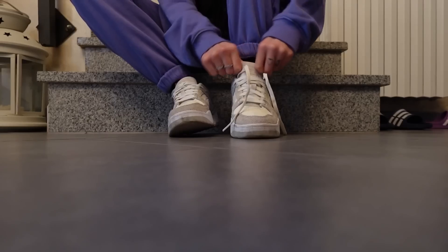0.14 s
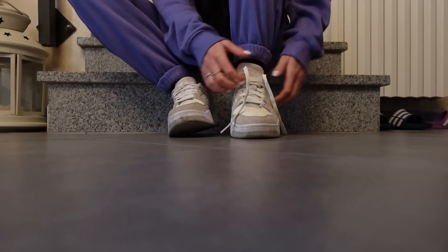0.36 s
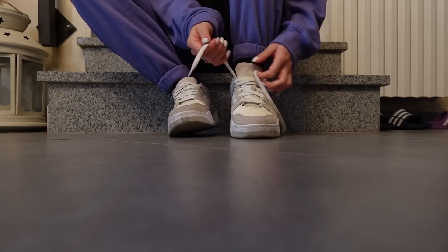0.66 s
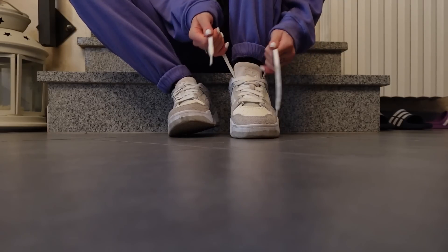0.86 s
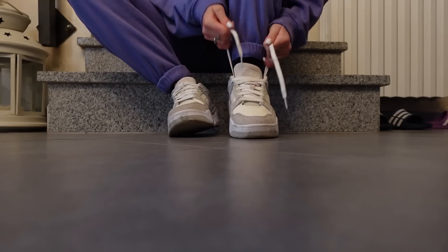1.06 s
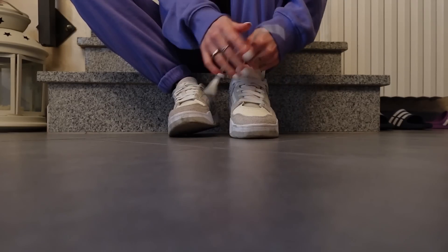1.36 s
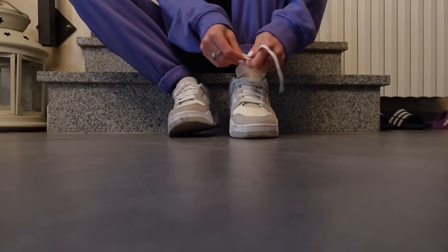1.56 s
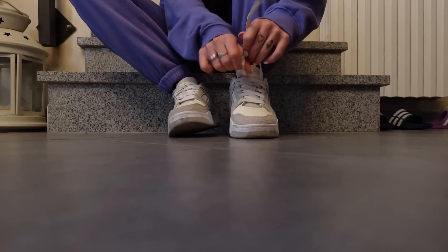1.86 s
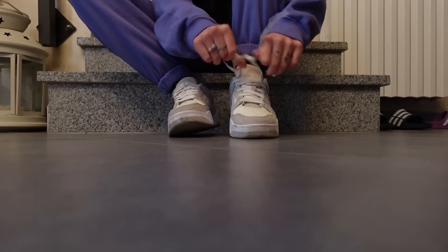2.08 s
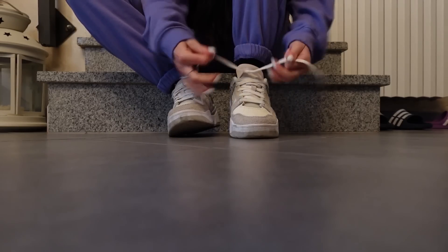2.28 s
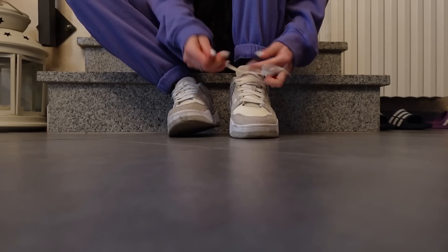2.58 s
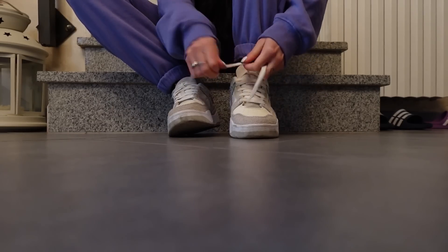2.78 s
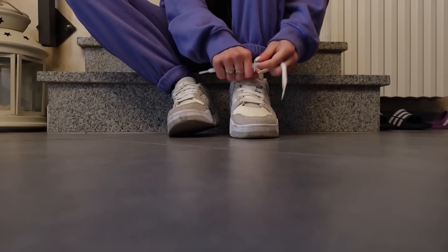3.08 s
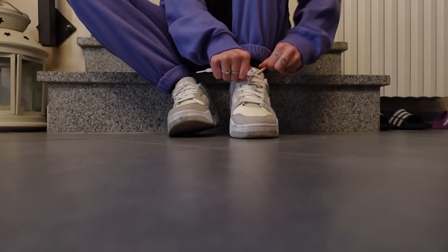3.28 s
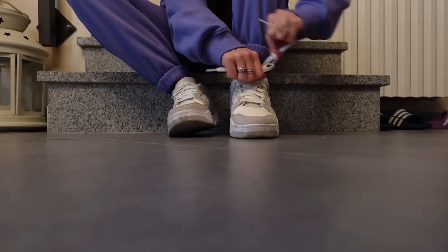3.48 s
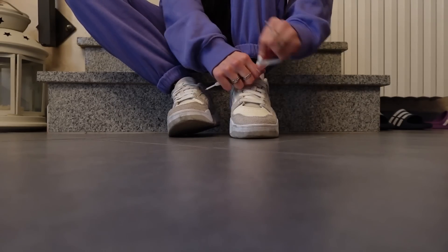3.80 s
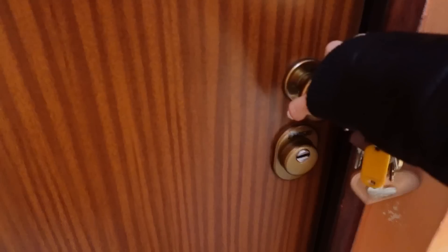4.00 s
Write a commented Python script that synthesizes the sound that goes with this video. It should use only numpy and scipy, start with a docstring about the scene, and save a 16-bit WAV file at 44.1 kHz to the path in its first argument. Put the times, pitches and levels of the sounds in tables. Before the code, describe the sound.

Close up in a quiet stone hallway, shoelaces are tugged and knotted: short grainy rubs, bright lace-on-lace hisses, a quick cluster of hollow knocks early on, tiny plastic-tip ticks and one sharp double snap midway. It thins to near silence, then at the very end a door and its metal lock burst out far louder, ringing in a stairwell with a key clink.

```python
"""Shoe laces are pulled and knotted close up: strokes of grainy noise ring the shoe's hollow and scratch its
skin, and lace slides on lace as a bright, denser hiss. Slips, knocks and lace tips are short decaying sines,
with a noisy echo from stone walls. At the end a door and its lock ring out loudly in a stairwell as dense
resonant noise over low booms, and a key clinks. Faint filtered noise is the air of the quiet hallway."""
import sys
import numpy as np
from scipy import signal
from scipy.fft import rfft, irfft
from scipy.io import wavfile

SR = 44100
rng = np.random.default_rng(int(sys.argv[2]) if len(sys.argv) > 2 else 0)


def wav_record(signal):
    """Record a signal, one row per channel, as 16-bit PCM in the file named by sys.argv[1]."""
    frames = np.transpose(np.atleast_2d(signal))
    bounded = np.clip(frames, -1, 1)
    # unit amplitude maps onto the largest positive 16-bit level
    quanta = np.round(bounded * 32767).astype(np.int16)
    wavfile.write(sys.argv[1], SR, quanta)


N = 182970

# resonances of the shoe's hollow: [f/Hz, width/Hz, relative level/dB]
SHOE_MODES = [(663.6, 92, 6.5), (850, 107, 0), (1042, 114, -4.5), (1415, 780, 4.5)]
# pulls of lace and finger over the shoe: [t/s, length/s, hollow level/dB, scratch level/dB, hollow f/Hz]
LACE_PULLS = [(0.036, 0.071, -41, -46, 1000), (0.163, 0.1, -45, -46, 1190), (.306, 0.015, -49, -63, 800),
              (0.426, 0.022, -40.5, -47, 740), (0.465, 0.093, -36, -43.5, 1050),
              (0.567, 0.068, -44, -53.5, 1200), (0.638, 0.088, -46, -52.5, 880),
              (0.723, .11, -46.5, -48, 800), (0.847, 0.093, -53, -53.5, 900),
              (0.942, 0.051, -45.5, -46.5, 1960), (0.998, 0.05, -52, -52, 1900),
              (1.17, 0.085, -53, -53, 890), (1.691, 0.022, -54.5, -57, 1200), (1.744, 0.08, -53, -55, 950),
              (1.843, 0.06, -51, -50, 930), (1.963, 0.02, -52, -53, 1490), (2.106, 0.079, -48, -52.5, 850),
              (2.191, 0.081, -42, -47, 830), (2.279, 0.049, -45.5, -46.5, 870),
              (2.335, 0.062, -51, -49, 900), (2.447, 0.042, -38.5, -40, 1200),
              (2.641, 0.029, -52.5, -56, 1110), (2.747, 0.14, -56, -61.5, 900),
              (3.019, 0.03, -53, -51.5, 900), (3.135, 0.089, -56, -53.5, 1200),
              (3.248, 0.068, -44.5, -48, 1390)]


def from_db(db):
    """Gain of a level in dB."""
    return 10 ** (np.asarray(db) / 20)


def rms_one(x):
    """Scaled to rms 1."""
    return x / np.sqrt(np.mean(x ** 2) + 1e-20)


def at_hz(points, hz):
    """A spectrum table read on a log-frequency axis."""
    points = np.array(points)
    return np.interp(np.log(hz), np.log(points[:, 0]), points[:, 1])


def peaks(modes, hz):
    """Magnitude of resonances (Hz, width in Hz, dB) whose powers add."""
    return np.sqrt(sum(from_db(2 * db) / (1 + (2 * (hz - f) / width) ** 2) for f, width, db in modes))


def shaped(x, gain):
    """Filtered by a magnitude given as a function of frequency; rms 1."""
    hz = np.maximum(np.fft.rfftfreq(N, 1 / SR), 1)
    return rms_one(irfft(rfft(x) * gain(hz), N))


def stereo(mid, side, likeness, lean):
    """Mixes two signals to a left-right pair, with likeness and balance set frequency by frequency."""
    hz = np.maximum(np.fft.rfftfreq(N, 1 / SR), 1)
    alike = np.clip(at_hz(likeness, hz), 0, 1)
    tilt = from_db(at_hz(lean, hz) / 2)
    m = rfft(mid) * np.sqrt((1 + alike) / 2)
    s = rfft(side) * np.sqrt((1 - alike) / 2)
    return irfft([(m + s) * tilt, (m - s) / tilt], N)


def drift(rate_hz):
    """Slow chance: noise twice through a one-pole low-pass; rms 1."""
    r = np.exp(-2 * np.pi * rate_hz / SR)
    noise = rng.standard_normal(N + SR)
    slow = signal.lfilter([1], [1, -2 * r, r * r], noise)[SR:]   # the first second settles the filter
    return rms_one(slow)


def grains(per_s, spread_db):
    """Two unrelated trains of fibre slips of uneven size and random sign."""
    sizes = from_db(spread_db * np.minimum(rng.exponential(1, (2, N)), 5))
    signs = rng.choice([-1, 1], (2, N))
    return sizes * signs * (rng.random((2, N)) < per_s / SR)


def ring(at_s, hz, t60):
    """A sine that starts at a moment at height 1 and decays by 60 dB in t60 seconds."""
    out, first = np.zeros(N), int(at_s * SR) + 1
    t = np.arange(first, min(first + int(2 * t60 * SR) + 2, N)) / SR - at_s
    out[first:first + len(t)] = np.sin(2 * np.pi * hz * t) * from_db(-60 * t / t60)
    return out


def strokes(start_s, length_s, level_db, rise_s, fall_s):
    """Level in time of strokes that swell, hold and let go; overlapping strokes add in power."""
    swell = 0.18   # the rise grows by this share of the stroke's length
    t, power = np.arange(N) / SR, 0
    for s, length, db in zip(start_s, length_s, level_db):
        rise = np.clip((t - s) / (rise_s + swell * length), 0, 1)
        fall = np.exp(-np.maximum(t - s - length, 0) / fall_s)
        power = power + (from_db(db) * rise * fall) ** 2
    return np.sqrt(power)


def drag():
    """Slips of the lace excite the shoe's hollow, pitched by the grip, and scratch on its skin; the sole thuds."""
    # colour of the scratch: [f/Hz, relative level per Hz/dB]
    scratch_colour = [(710, -55), (1200, -23.5), (1790, -5.5), (2200, -1), (4530, -7.5), (5690, -15.5),
                      (7000, -14.5), (9100, -32), (15400, -120)]
    # colour of the sole's thud: [f/Hz, relative level per Hz/dB]
    thud_colour = [(24, -69), (40, -42), (123, -25.5), (243, 4), (415, -4.5), (450, -18), (580, -35),
                   (990, -120)]
    # the sole pressed on the floor: [t/s, length/s, level/dB]
    presses = [(0.426, .03, -52.5), (0.498, 0.087, -51), (0.675, 0.034, -46), (.75, 0.06, -56),
               (1.883, 0.017, -62), (2.457, 0.03, -61), (3.036, 0.018, -67.5), (3.244, .03, -59.5)]
    catch_db = 3.0      # rms swing of the level
    pull_width = 0.63   # bandwidth of a pull's pitch, as a share of that pitch

    def hollow_gain(hz):
        return peaks(SHOE_MODES, hz) / (1 + (560 / hz) ** 8) / (1 + (hz / 2600) ** 4)

    body = shaped(grains(5000, spread_db=2.0), hollow_gain)
    scratch = shaped(grains(9000, spread_db=2.5), lambda hz: from_db(at_hz(scratch_colour, hz)))
    thud = shaped(rng.standard_normal((2, N)), lambda hz: from_db(at_hz(thud_colour, hz)))
    catching = from_db(catch_db * drift(85))   # the weave catches and lets go

    hollow = 0
    for at, span, db, _, hz in LACE_PULLS:
        pitched = rms_one(signal.lfilter(*signal.iirpeak(hz, 1 / pull_width, SR), body))
        hollow = hollow + strokes([at], [span], [db], rise_s=0.0099, fall_s=0.023) * pitched

    s, length, _, scratch_db, _ = np.transpose(LACE_PULLS)
    scratching = strokes(s, length, scratch_db, rise_s=0.0032, fall_s=0.026) * scratch
    pressing = strokes(*np.transpose(presses), rise_s=0.0061, fall_s=0.032) * thud
    return (hollow + scratching) * catching + pressing


def slide():
    """Very dense fibre slips merge to a bright hiss, in slides and in every pull."""
    # colour of the hiss: [f/Hz, relative level per Hz/dB]
    hiss_colour = [(1200, -60), (2940, -19), (5000, 1.5), (6070, -6), (6830, 1.5), (11900, 6), (15100, 2),
                   (16000, -26)]
    # woven lace sliding on lace: [t/s, length/s, level/dB]
    slides = [(0.03, 0.1, -57), (0.177, 0.074, -50), (1.172, 0.025, -52), (1.542, 0.035, -58),
              (1.656, 0.046, -48), (1.74, .095, -50), (1.842, 0.043, -45.5), (1.962, 0.022, -47),
              (2.099, .013, -36), (2.118, 0.135, -44), (2.298, 0.014, -48), (2.392, .034, -50.5),
              (2.442, 0.036, -42.5), (2.578, 0.029, -47), (2.637, 0.03, -52.5), (3.005, 0.033, -51.5),
              (3.123, 0.07, -49)]
    pull_hiss_db, hiss_follows = -34.5, 0.45   # base level, plus this share of the pull's scratch level
    hiss = shaped(grains(23000, spread_db=3.5), lambda hz: from_db(at_hz(hiss_colour, hz)))
    pulls = [(s, length, pull_hiss_db + hiss_follows * scratch_db) for s, length, _, scratch_db, _ in LACE_PULLS]
    level = strokes(*np.transpose([*pulls, *slides]), rise_s=0.009, fall_s=0.014)
    return level * from_db(2.0 * drift(70)) * hiss


def knocks():
    """A crack at its own pitch with a bright snap, then the shoe's hollow rings on."""
    # slips and knocks on the shoe: [t/s, level/dB, f/Hz, snap re crack/dB, hollow ring re crack/dB]
    hits = [(0.4298, -24, 1530, 10.5, -8), (.44, -19, 795, -8, -7.5), (0.4693, -19, 1410, 1, -11),
            (.4805, -21, 2200, -6, -23), (.491, -18, 2900, -4, -26), (0.4976, -8, 1280, -25, -24),
            (0.5097, -15, 1430, -20, -16.5), (.5125, -20, 1500, -20, -17), (.521, -21, 800, -14, -14),
            (.525, -9.5, 1120, -11, -12.5), (.531, -17, 2490, -3, -17), (.548, -12.5, 2450, -4, -17),
            (.554, -9.5, 1120, -16, -19), (.643, -19, 1360, -20, -16), (.683, -12.5, 1000, -9, -21),
            (.7533, -26, 1600, -3, -13), (.768, -18.5, 740, -9, -15), (0.801, -18, 850, -10, -14),
            (1.696, -30, 1210, -15, -21), (1.891, -27.5, 596, -9, -17), (2.1119, -16, 960, -23, -19.5),
            (2.2653, 0, 2210, -33, -23.5), (2.2732, -4.5, 2800, -24, -35), (2.299, -22, 3200, -9, -29),
            (2.4036, -24, 1200, -11, -21.5), (2.454, -20, 850, -10, -17.5), (2.662, -30.5, 1200, -9, -16.5),
            (2.813, -32.5, 690, -9, -11), (3.2521, -15.5, 1430, -15, -23), (3.953, -26, 1010, -16, -16.5)]
    out = np.zeros(N)
    mode_luck = rng.normal(0, 1, (len(hits), len(SHOE_MODES)))
    for (s, db, hz, snap_db, ring_db), luck in zip(hits, mode_luck):
        crack = ring(s, hz, 5.6 / hz)   # gone in a few periods
        snap = from_db(snap_db) * ring(s, 3500, 0.00085)
        hollow = 0
        for (f, width, level), chance in zip(SHOE_MODES, luck):
            mode_db = level + ring_db + 1.5 * chance
            # the hollow answers a little late; a narrow mode rings longer
            hollow = hollow + from_db(mode_db) * ring(s + 0.00056, f, 2.04 / width)
        out += from_db(db) * (crack + snap + hollow)
    return signal.sosfilt(signal.butter(4, 5600, fs=SR, output="sos"), out)   # low-pass, Hz


def ticks():
    """Hard plastic tips: a wide click with a millisecond or two of ring."""
    # lace tips ticking: [t/s, level/dB, f/Hz]
    tips = [(1.5476, -30.5, 10800), (1.567, -31.5, 8000), (1.666, -27, 13100), (1.6993, -22.5, 4230),
            (1.9752, -22, 11100), (1.985, -28, 12500), (2.007, -30, 12500), (2.1114, -24, 12200),
            (2.3108, -26, 12800), (2.3153, -24, 12800), (2.3991, -24, 13700), (2.4049, -19.5, 4800),
            (2.416, -23, 13500), (2.425, -29, 12500), (2.6932, -29, 12200), (3.3492, -27, 11200)]
    out = np.zeros(N)
    for s, db, hz in tips:
        click = from_db(-8.0) * ring(s, 10700, 0.00058)
        out += from_db(db) * (ring(s, hz, 0.0018) + click)
    return out


def echo(x):
    """Stone walls send each hit back as a short noisy tail."""
    t60_s, level_db = 0.16, -12
    t = np.arange(int(.3 * SR)) / SR
    tail = rng.standard_normal((2, len(t))) * from_db(-60 * t / t60_s) * (t > .002)   # 2 ms gap
    tail /= np.sqrt(np.sum(tail ** 2, axis=1, keepdims=True))   # unit energy
    return from_db(level_db) * signal.fftconvolve(x[None], tail, axes=1)[:, :N]


def door():
    """The stairwell smears the blow to dense noise that keeps the rings of leaf and lock; one key clinks."""
    # colour of the wash: [f/Hz, relative level per Hz/dB]
    colour = [(18, -60), (45, -38), (215, -12.5), (252, -1), (355, -11), (632, 3), (1280, -7), (1860, 0),
              (3490, -13.5), (5040, -8.5), (9220, -29), (11100, -30), (16000, -42)]
    # resonances of door leaf and lock: [f/Hz, width/Hz, relative level/dB]
    leaf_and_lock = [(1050, 40, -6), (2030, 70, -7), (2470, 60, 3), (2880, 86, -1.5), (4070, 110, -0.5),
                     (4960, 290, 4.5), (6000, 210, -7), (3360, 400, -11)]
    # lowest modes of the door leaf: [f/Hz, level/dB, t60/s]
    booms = [(68, -53, 2.8), (250, -30, .3), (650, -37, .8)]
    # ringing modes of the key: [f/Hz, relative level/dB, t60/s]
    key_modes = [(8000, 1.5, 0.027), (10730, 3, 0.054), (11400, -4, 0.061), (11600, 0, 0.15),
                 (14150, 0, .04)]
    # stereo width: [f/Hz, left-right likeness]
    door_likeness = [(60, 1), (240, 0.99), (950, 0.92), (3770, 0.8), (15000, 0.47)]
    # stereo balance: [f/Hz, left minus right/dB]
    door_lean = [(60, 1), (240, -1.5), (950, 0.5), (3770, -2.5), (15000, 2)]
    door_s, rise_s, door_db, t60_s = 3.993, 0.021, -21.5, 1.2
    key_s, key_db = 4.0455, -32.5

    def wash_gain(hz):
        return from_db(at_hz(colour, hz)) + peaks(leaf_and_lock, hz) / (1 + (hz / 7000) ** 6)

    t = np.maximum(np.arange(N) / SR - door_s, 0)
    swell = np.minimum(t / rise_s, 1)
    wash = shaped(grains(12000, spread_db=1.5), wash_gain) * swell * from_db(door_db - 60 * t / t60_s)
    boom = swell * sum(from_db(db) * ring(door_s, hz, t60) for hz, db, t60 in booms)
    key = sum(from_db(db) * ring(key_s, hz, t60) for hz, db, t60 in key_modes)
    key = key + from_db(10) * ring(key_s, 12000, .001)   # the touch of metal
    return stereo(wash[0] + from_db(key_db) * key + boom, wash[1], door_likeness, door_lean)


def hallway_air():
    """The quiet hallway's air: steady coloured noise whose level sways slowly."""
    # colour of the air: [f/Hz, relative level per Hz/dB]
    air_colour = [(18, -80), (30, -60), (239, -15), (437, -8), (569, -3.5), (721, -4.5), (780, -2.5),
                  (2610, -3), (3580, -5), (5740, -9), (15900, -13)]
    level_db, sway_db = -50.5, .8
    air = shaped(rng.standard_normal((2, N)), lambda hz: from_db(at_hz(air_colour, hz)))
    return air * from_db(level_db + sway_db * drift(0.67))


def scene():
    """Laces and shoe, then the door, over hallway air."""
    # stereo width of laces, shoe and air: [f/Hz, left-right likeness]
    near_likeness = [(60, 0.98), (240, 0.9), (950, 0.85), (3770, 0.78), (15000, .97)]
    # stereo balance of laces, shoe and air: [f/Hz, left minus right/dB]
    near_lean = [(950, 0), (3770, -.5)]
    hits = knocks() + ticks()
    # small things radiate little bass
    hits = signal.sosfilt(signal.butter(5, 620, "high", fs=SR, output="sos"), hits)
    mid, side = drag() + slide() + echo(hits) + hallway_air()
    return stereo(mid + hits, side, near_likeness, near_lean) + door()


def record(dry):
    """The microphone drops the deepest bass; the top is cut steeply."""
    dry = signal.sosfilt(signal.butter(2, 55, "high", fs=SR, output="sos"), dry)
    return signal.sosfilt(signal.ellip(12, .5, 60, 15900, fs=SR, output="sos"), dry)


dry = scene()
out = record(dry)
wav_record(out)
```